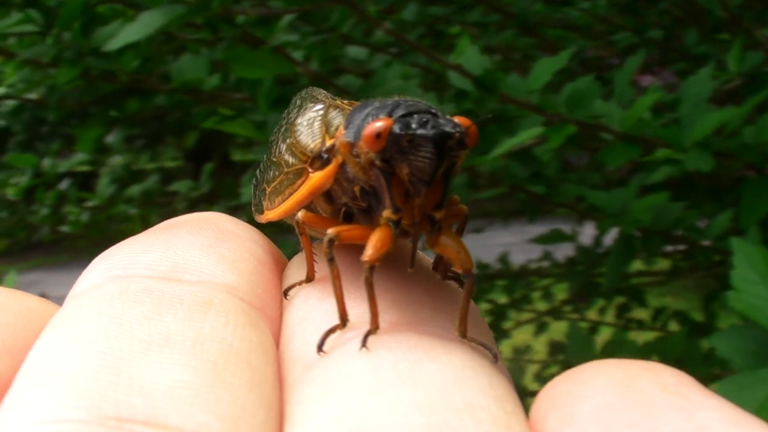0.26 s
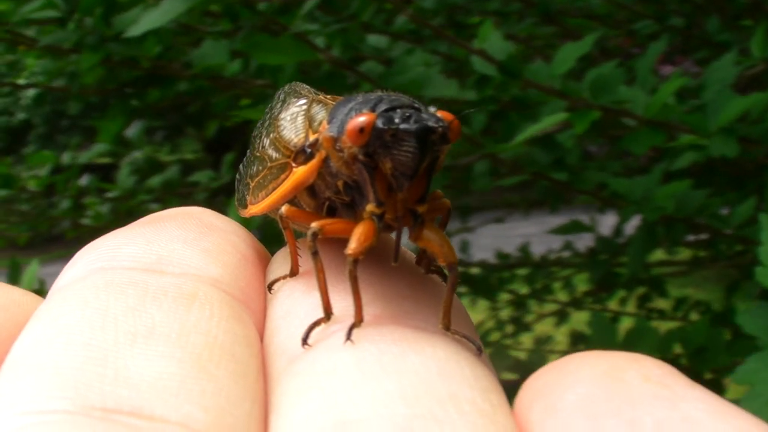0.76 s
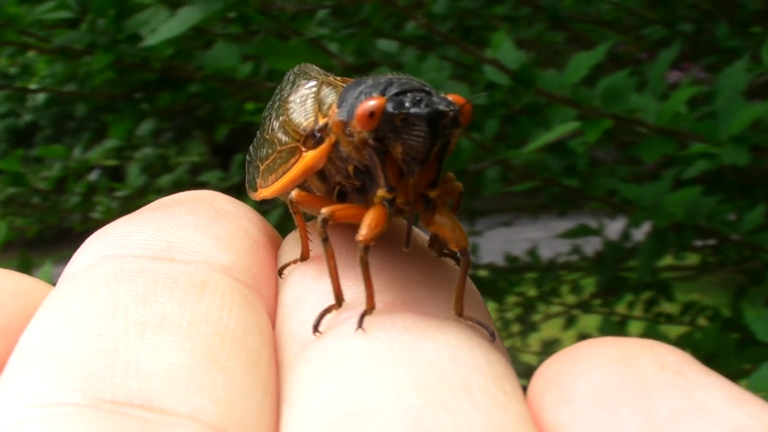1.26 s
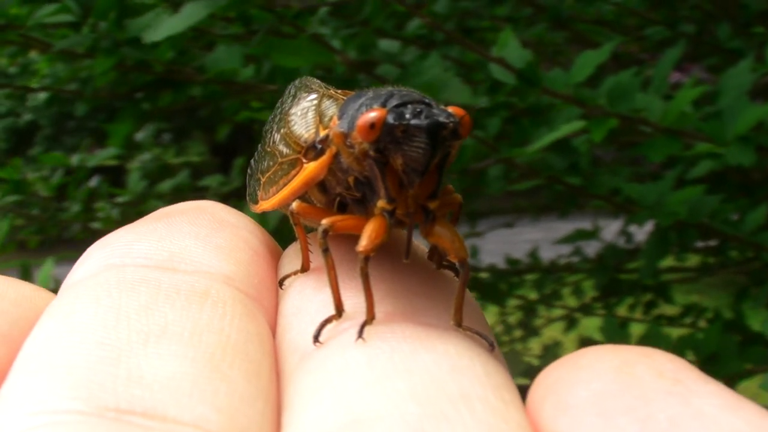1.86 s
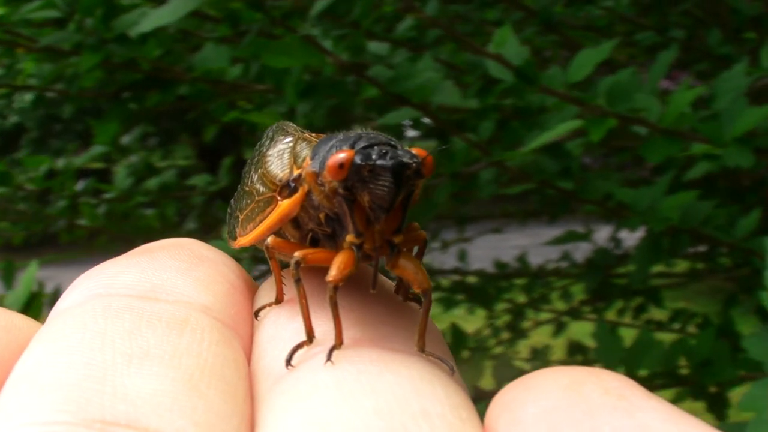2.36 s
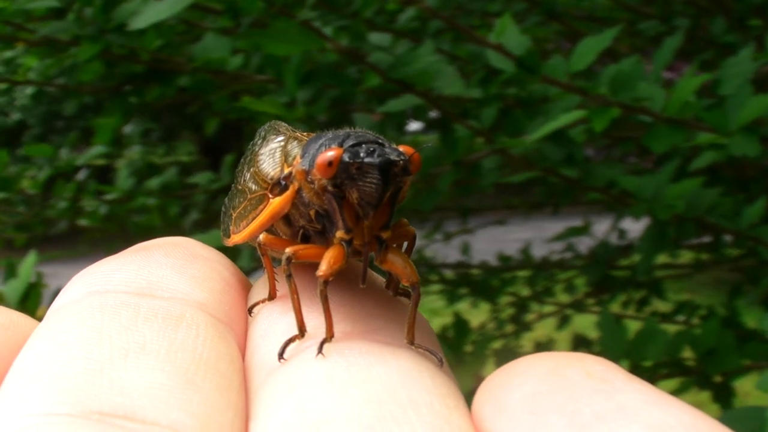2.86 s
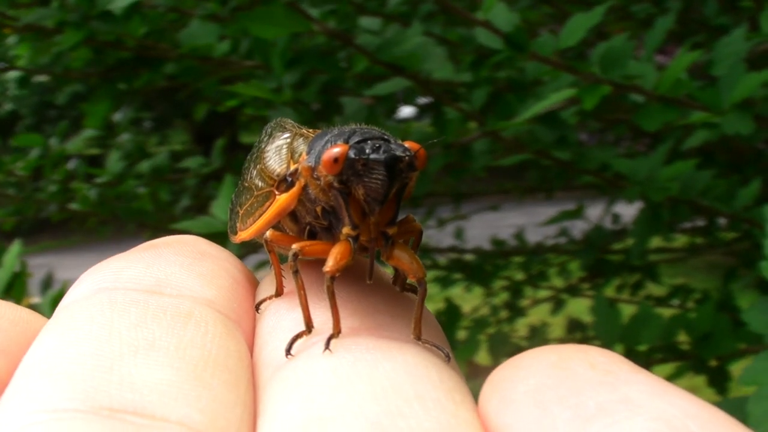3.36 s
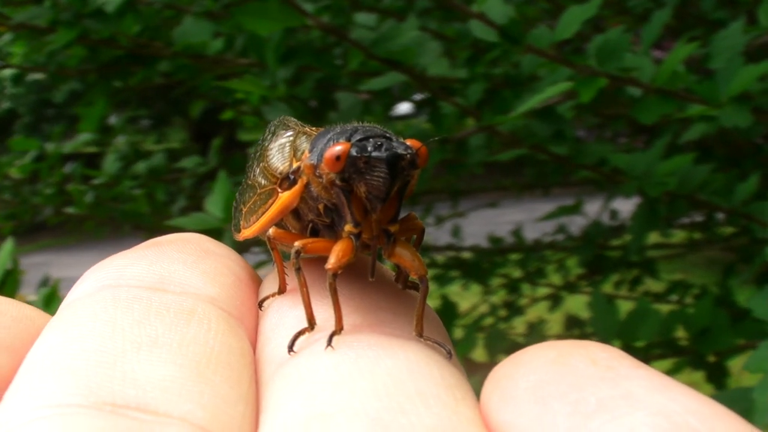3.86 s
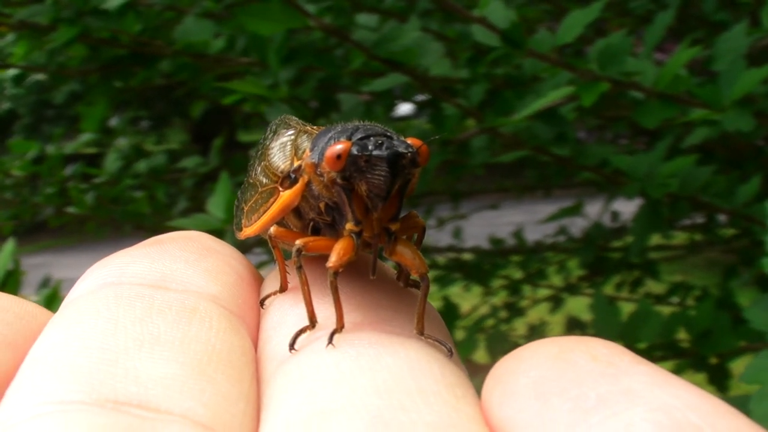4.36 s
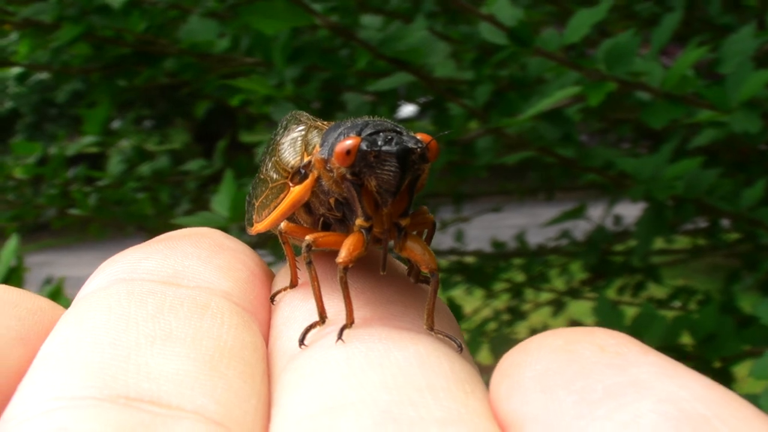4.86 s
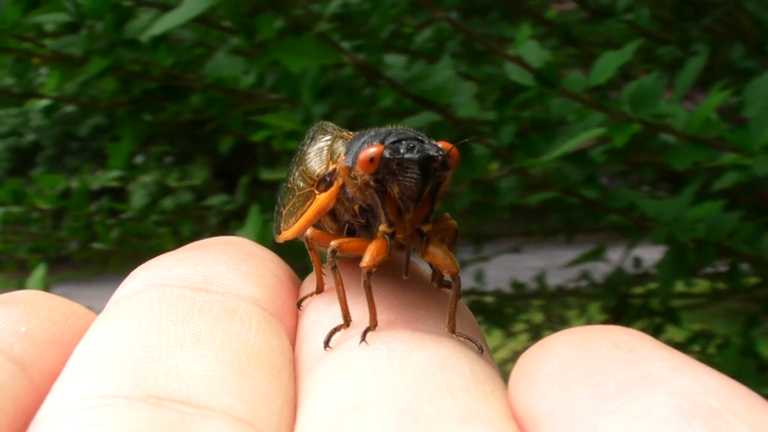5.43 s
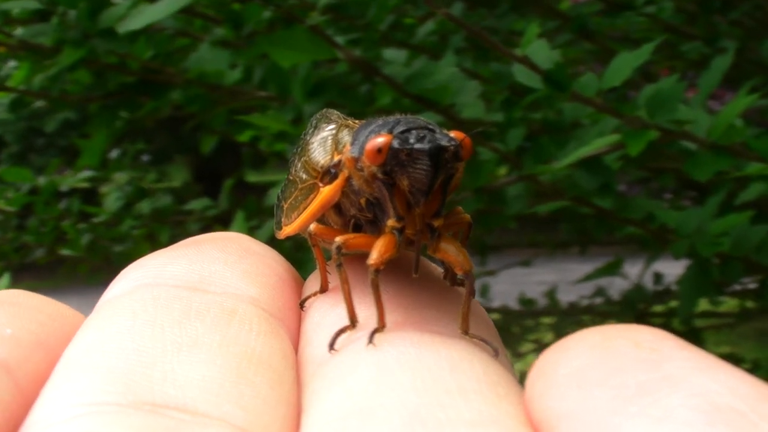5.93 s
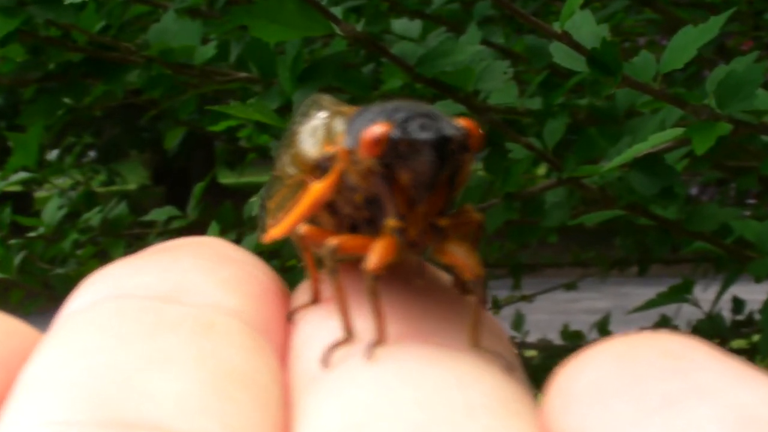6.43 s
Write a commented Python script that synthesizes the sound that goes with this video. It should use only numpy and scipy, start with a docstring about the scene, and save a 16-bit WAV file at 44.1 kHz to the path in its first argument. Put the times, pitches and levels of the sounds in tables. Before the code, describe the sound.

A dense distant cicada chorus drones on one steady pitch in a wood, under a high sizzle with quick small buzzes and faint traffic rumble.

```python
"""A far crowd of cicadas drones on one low pitch, under a high sizzle from a second kind, in a wood.
The drone is many trains of rib clicks, coloured by hollow bellies; its octave and the wash are shaped noise.
One high caller gives short pulsed-noise buzzes about three times a second, and a few others stray in.
Traffic rumbles behind the trees as filtered noise; wavering sines make engine notes and a thin falling whine.
A tiny dry tick comes midway, and three light taps on the hand-held camera that listens come late."""
import sys
import numpy as np
from scipy import signal
from scipy.fft import rfft, irfft, next_fast_len
from scipy.io import wavfile
from scipy.ndimage import uniform_filter1d, map_coordinates

SR = 44100
rng = np.random.default_rng(int(sys.argv[2]) if len(sys.argv) > 2 else 0)


def bounce(signal):
    """Save signal as a 16-bit WAV file at the path given by the first command-line argument."""
    frames = np.transpose(np.atleast_2d(signal))
    limited = np.clip(frames, -1, 1)
    pcm = np.round(limited * 32767).astype(np.int16)
    wavfile.write(sys.argv[1], SR, pcm)


N = 295330


def amp(db):
    """Linear gain for a level in dB."""
    return 10 ** (np.asarray(db) / 20)


def unit(x):
    """Scale to an RMS of one."""
    return x / np.sqrt(np.mean(x ** 2) + 1e-20)


def along(points, hz):
    """Read (Hz, value) points on a log frequency axis."""
    point_hz, value = np.transpose(points)
    return np.interp(np.log(hz + 1), np.log(point_hz + 1), value)


def curves(rows):
    """One value per sample for each column after the time in seconds."""
    s, *columns = np.transpose(rows)
    t = np.arange(N) / SR
    return [np.interp(t, s, column) for column in columns]


def wobble(rate):
    """A smooth random curve, rate knots a second."""
    knots = rng.standard_normal(int(N * rate / SR) + 4)
    return map_coordinates(knots, [np.arange(N) * rate / SR])


def filtered(x, response):
    """Multiply the spectrum by a (possibly complex) response of frequency."""
    size = next_fast_len(N + SR // 2)
    hz = np.fft.rfftfreq(size, 1 / SR)
    return irfft(rfft(x, size) * response(hz), size)[..., :N]


def sides(lean_db):
    """Left and right gains for a left-minus-right level in dB."""
    return amp(np.array([lean_db / 2, -lean_db / 2]))


def patchy(pair, patchy_db):
    """Leaves and distance vary the level of each patch of time and pitch by chance."""
    spectrogram = signal.stft(pair, nperseg=512)[2]
    field = rng.standard_normal(spectrogram.shape[1:])
    field = uniform_filter1d(field, size=8, axis=0)  # across pitch
    field = uniform_filter1d(field, size=10, axis=1)  # across time
    return signal.istft(spectrogram * amp(patchy_db * unit(field)), nperseg=512)[1][:, :N]


# How alike the two microphone ports hear a crowd. Each row: frequency in Hz, left-right correlation (-1 to 1).
PORT_LIKENESS = [(25, .85), (100, .94), (250, .88), (450, .68), (750, .53), (1150, .68), (1600, .68),
                 (2200, .45), (2600, .3), (3100, -.3), (4500, -.2), (6500, .05), (15000, 0)]


def ports(pair, colour, lag):
    """Colour two unrelated crowds and mix them to the ports' likeness; the right port leads by lag seconds."""
    def middle_and_side(hz):
        turn = np.arccos(np.clip(along(PORT_LIKENESS, hz), -1, 1)) / 2
        return amp(along(colour, hz)) * [np.cos(turn), np.sin(turn)]

    def delay(hz):
        return np.exp(-1j * np.pi * hz * lag * np.array([[1], [-1]]))

    mid, side = filtered(pair, middle_and_side)
    return unit(filtered(np.array([mid + side, mid - side]), delay))


def crowd(clicks_hz, jitter, swell_db, count):
    """Rib clicks of many singers, each at its own drifting pace and strength, for two crowds."""
    pair = np.zeros((2, N))
    for singer in range(2 * count):
        pace = clicks_hz * (rng.uniform(.8, 1.2) + .01 * wobble(4))
        cycles = rng.uniform() + np.cumsum(pace) / SR
        at = np.flatnonzero(np.diff(np.floor(cycles)))
        effort = amp(swell_db * wobble(3.046))[at] * (1 + 0.34 * rng.standard_normal(len(at)))
        scatter = rng.normal(0, jitter * SR / clicks_hz, len(at))  # jitter is a share of the click period
        at = (at + scatter).astype(int) % N
        np.add.at(pair[singer % 2], at, effort)
    return pair - pair.mean()


# The low chorus before the camera body shades it. Each row: time in seconds, level in dB, left minus right in dB.
DRONE_LEVEL = [(0, -19, -2), (1, -19, -3.5), (1.6, -18, -3), (2.7, -18.5, -2.5), (3.05, -17.5, -2),
               (3.6, -18.5, -3), (4.5, -19, -3), (5, -19.5, -1.5), (5.6, -18, -0.5), (6.7, -19.5, -2)]
# What the hollow bellies of the low singers pass. Each row: frequency in Hz, colour in dB per Hz.
BELLY_COLOUR = [(700, -45.5), (960, -34), (1060, -21.5), (1165, -8.5), (1225, -6.5), (1270, -2.5),
                (1308, 1), (1345, -2), (1390, -7), (1460, -14), (1610, -24), (1750, -30), (2100, -43.5),
                (3000, -120)]
# Level of the deeper singers. Each row: time in seconds, level in dB.
DEEP_LEVEL = [(0, -35.5), (1.2, -40), (2.1, -39), (2.6, -36), (3, -39.5), (4.6, -37.5), (6.7, -39.5)]
# What the bellies of the deeper singers pass. Each row: frequency in Hz, colour in dB per Hz.
DEEP_COLOUR = [(450, -32), (700, -15), (790, -9), (870, 1), (960, -1.5), (1050, 0), (1300, -21),
               (2000, -120)]


def drone():
    """Rib clicks through hollow bellies reach the right port first; a few deeper singers hum under them."""
    level_db, lean_db = curves(DRONE_LEVEL)
    chorus = ports(crowd(200, .03, 1.26, count=14), BELLY_COLOUR, lag=.000045)
    deeper = ports(crowd(150, .04, 1.3, count=8), DEEP_COLOUR, lag=.000045)
    deep_db = curves(DEEP_LEVEL)[0]
    return amp(level_db) * sides(lean_db) * chorus + amp(deep_db) * sides(-0.71)[:, None] * deeper


# Level of the low chorus's octave band. Each row: time in seconds, level in dB.
OCTAVE_LEVEL = [(0, -45.5), (2.2, -42.5), (3, -45.5), (4.6, -45), (5.3, -42), (6.7, -43)]
# Colour of that band. Each row: frequency in Hz, colour in dB per Hz.
OCTAVE_COLOUR = [(1200, -36), (1700, -17), (1950, -4), (2300, -0.5), (2550, 0.5), (2750, -6), (3000, -18),
                 (3600, -34), (6000, -120)]


def overtone():
    """The octave of the low chorus as a noise band, blurred by the spread of the singers' pitches."""
    noise = patchy(rng.standard_normal((2, N)), 0.91)
    return amp(curves(OCTAVE_LEVEL)[0]) * ports(noise, OCTAVE_COLOUR, lag=.00003)


# The high chorus, before its shared swell. Each row: time in seconds, level in dB.
SIZZLE_LEVEL = [(0, -37.5), (.5, -39), (1.5, -37.5), (2.7, -37), (3.2, -36.5), (4, -37.5), (4.4, -35.5),
                (5.1, -37), (5.8, -35), (6.7, -36.5)]
# Colour of the high singers. Each row: frequency in Hz, colour in dB per Hz.
SIZZLE_COLOUR = [(4240, -10), (7200, -10.5), (8210, -1), (8960, -1), (9680, -5.5), (10800, -16),
                 (14600, -27.5), (15500, -32)]
# Click noise of the whole wood. Each row: frequency in Hz, colour in dB per Hz.
WASH_COLOUR = [(1500, -35), (2500, -15.5), (3140, -17), (3500, -12), (3800, -6), (4100, -9.5),
               (4840, -11.5), (6200, -10.5), (7600, -11), (9880, -39), (16700, -120)]
WASH_START_DB, WASH_END_DB = -39, -41  # thins slowly, before the swell


def sizzle():
    """Fast clicks of high singers swell together; the wood's broad noise wash follows them a little less."""
    high_db = curves(SIZZLE_LEVEL)[0]
    wash_db = np.linspace(WASH_START_DB, WASH_END_DB, N)
    swell = wobble(7)
    high = ports(patchy(crowd(900, .3, 2, count=10), 1.1), SIZZLE_COLOUR, lag=0)
    wash = ports(patchy(rng.standard_normal((2, N)), 0.91), WASH_COLOUR, lag=0)
    return amp(high_db + .5 * swell) * high + amp(wash_db + 0.39 * swell) * wash


def note(rows, waver_hz, waver_db, step=0):
    """An unsteady sine along (s, Hz, dB) rows; step is the phase lead of the right port in radians."""
    hz, db = curves(rows)
    phase = 2 * np.pi * np.cumsum(hz + waver_hz * wobble(8)) / SR
    return amp(db + waver_db * wobble(6.2)) * np.sin(phase + np.array([[0], [step]]))


FAINT_DB, FADE_S = -72, .14  # level at both ends of a passing note, and its fade time


def glide(start, end, first_hz, last_hz, db):
    """Rows (s, Hz, dB) of a note that fades in, holds and fades out while it glides."""
    fade = FADE_S / (end - start)
    share = np.array([0, fade, 1 - fade, 1])
    s = start + share * (end - start)
    hz = first_hz + share * (last_hz - first_hz)
    return np.transpose([s, hz, [FAINT_DB, db, db, FAINT_DB]])


# Tyres and engines. Each row: frequency in Hz, colour in dB per Hz.
RUMBLE_COLOUR = [(12, -44), (20, -16), (59, -2.5), (108, 0.5), (168, -5), (307, -8.5), (519, -16.5),
                 (707, -16.5), (800, -10), (1040, -25), (1760, -120)]
RUMBLE_DB = -36
# Engine hum before it wavers. Each row: time in seconds, pitch in Hz, level in dB.
ENGINE_HUM = [(0, 120, -44), (1.3, 110.8, -45), (1.55, 110, -40.5), (2.7, 109, -42), (3.1, 112, -48),
              (4, 110, -43), (5.2, 117.5, -63), (6.2, 116, -47), (6.7, 118, -56)]
# Passing notes before they waver. Each row: start and end in seconds, first and last pitch in Hz, level in dB.
PASSING_NOTES = [(.4, 1, 75, 75, -40.5), (1.18, 3.54, 70, 72, -45), (1.1, 2.7, 313, 296, -49),
                 (4.85, 5.45, 180, 211, -40)]
# The falling whine before it wavers. One row: start and end in seconds, first and last pitch in Hz, level in dB.
FALLING_WHINE = (1.1, 2.4, 2812, 2606, -49)


def road():
    """Broad noise rumble, engine notes, and a fluttering whine that meets the ports out of step."""
    noise = patchy(rng.standard_normal((2, N)), 0.94)
    rumble = amp(RUMBLE_DB) * ports(noise, RUMBLE_COLOUR, lag=0)
    hum = note(ENGINE_HUM, waver_hz=.8, waver_db=1.2)
    passing = sum(note(glide(*row), waver_hz=1.48, waver_db=2.3) for row in PASSING_NOTES)
    whine = note(glide(*FALLING_WHINE), waver_hz=5, waver_db=4.5, step=1.9)
    return rumble + hum + passing + whine


FIRST_BUZZ_S, BUZZ_PERIOD_S, BUZZ_SCATTER_S = .016, .3048, .008
BUZZ_START_DB, BUZZ_END_DB, BUZZ_SPREAD_DB = -42.5, -35.5, 1
BUZZ_HZ, BUZZ_LENGTH_S = 8440, 0.033


def even_buzzes():
    """Rows (s, dB, Hz, length s) of a nearer caller, nearly even in pace and growing louder."""
    at = np.arange(FIRST_BUZZ_S, N / SR, BUZZ_PERIOD_S)
    chance = rng.standard_normal((len(at), 2))
    db = np.linspace(BUZZ_START_DB, BUZZ_END_DB, len(at)) + BUZZ_SPREAD_DB * chance[:, 0]
    at = at + BUZZ_SCATTER_S * chance[:, 1]
    return [(abs(s), level, BUZZ_HZ, BUZZ_LENGTH_S) for s, level in zip(at, db)]


# Stray buzzes of other callers. Each row: peak time in seconds, level in dB, pitch in Hz, fall length in seconds.
STRAY_BUZZES = [(0.776, -38, 8500, 0.027), (4.385, -34, 8300, .015), (4.67, -39, 6900, .02),
                (5.31, -37, 7600, 0.027), (6.16, -36, 8200, .015), (6.47, -37, 8200, 0.023)]
BUZZ_LEAN_DB = -2  # left minus right, before the camera body shades it


def buzzes():
    """Each buzz is noise pulsing 120 times a second that rings near one pitch, blurred by the foliage."""
    lead = SR // 8  # room for the rise before each peak
    t = np.arange(-lead, SR // 4) / SR
    ring_t = np.arange(200) / SR
    out = np.zeros((2, N + SR))
    for s, db, hz, length in even_buzzes() + STRAY_BUZZES:
        shape = np.exp(-.5 * (t / np.where(t < 0, .4 * length, length)) ** 2)  # rises faster than it falls
        beat = .5 + np.sin(np.pi * 120 * t + rng.uniform(0, np.pi)) ** 4
        ring = np.sin(2 * np.pi * hz * ring_t) * amp(-60 * ring_t / 0.0032)
        noise = rng.standard_normal((2, len(t))) * beat
        burst = unit(signal.fftconvolve(noise, ring[None], axes=1)[:, :len(t)])
        out[:, round(s * SR):][:, :len(t)] += amp(db) * sides(BUZZ_LEAN_DB)[:, None] * shape * burst
    return filtered(out[:, lead:N + lead], lambda hz: 1 / (1 + (hz / 9800) ** 12))


# A tiny dry tick close by. Each row: start in seconds, peak level in dB.
TICKS = [(3.2345, -35)]


def ticks():
    """A very high sine under a narrow bell-shaped envelope, a few cycles of it standing out."""
    t = np.arange(90) / SR
    tick = np.hanning(len(t)) ** 3 * np.sin(2 * np.pi * 14000 * t)
    out = np.zeros(N)
    for s, db in TICKS:
        out[round(s * SR):][:len(t)] += amp(db) * tick
    return out


# Taps on the camera. Each row: start in seconds, gain on the whole shell sound in dB.
TAPS = [(5.2772, -21), (5.3025, -26), (5.3246, -23)]
# Modes of its shell. Each row: frequency in Hz, level in dB, time to fall 60 dB in seconds.
SHELL_MODES = [(320, -3, .02), (2450, 0, .008), (7200, -8, .005)]


def taps():
    """Light taps on the camera body: a dull push and two brief shell rings, as decaying sines."""
    t = np.arange(900) / SR
    shell = sum(amp(db - 60 * t / t60) * np.sin(2 * np.pi * hz * t) for hz, db, t60 in SHELL_MODES)
    out = np.zeros(N)
    for s, db in TAPS:
        out[round(s * SR):][:len(t)] += amp(db) * shell
    return out


def scene():
    """The wood, the road and the small sounds close by, added together."""
    return drone() + overtone() + sizzle() + road() + buzzes() + ticks() + taps()


# Shading of the two ports by the camera body. Each row: frequency in Hz, left minus right in dB.
BODY_LEAN = [(60, 0), (600, 0.5), (900, -1.5), (1700, 1.5), (2100, 4), (2600, 4.5), (3000, 5.5), (3500, 7),
             (4000, 1), (9000, 0), (11000, -3), (15000, 1)]
TOP_HZ = 15670


def record(dry):
    """The camera body shades the two ports differently; nothing passes above the band limit."""
    return filtered(dry, lambda hz: sides(along(BODY_LEAN, hz)) * (hz < TOP_HZ))


dry = scene()
out = record(dry)
bounce(out)
```